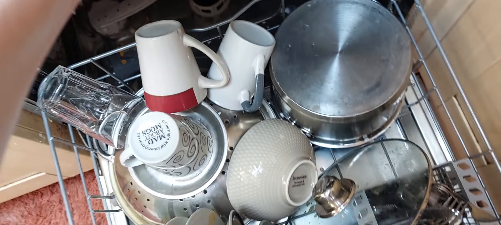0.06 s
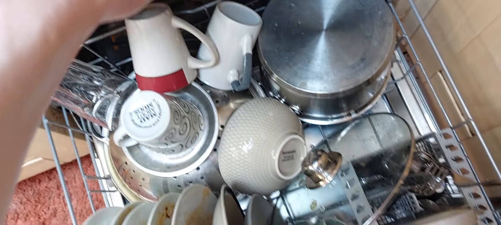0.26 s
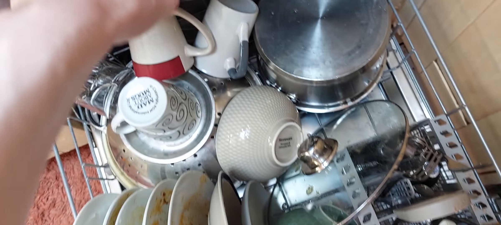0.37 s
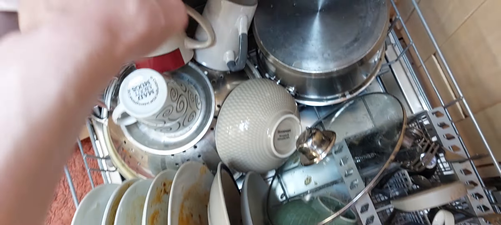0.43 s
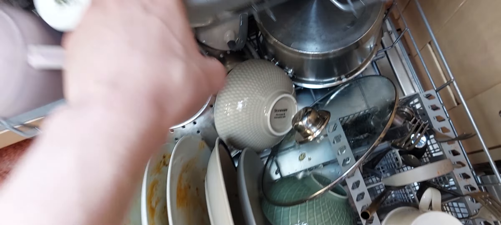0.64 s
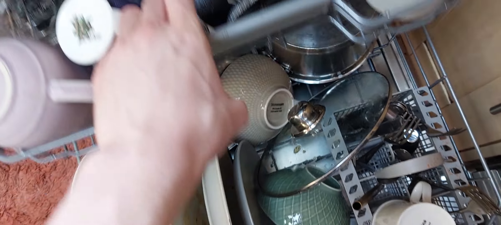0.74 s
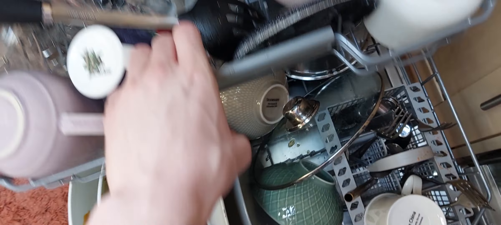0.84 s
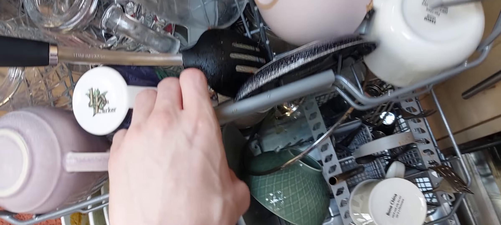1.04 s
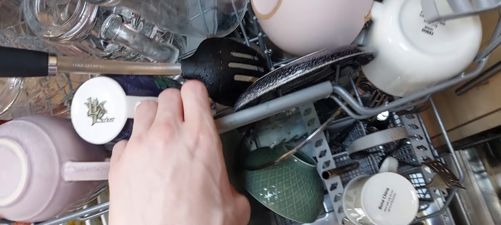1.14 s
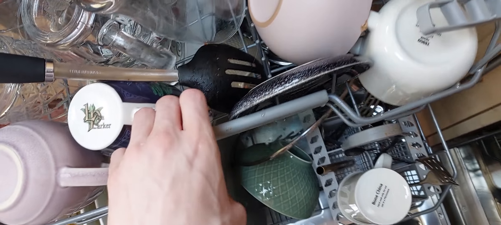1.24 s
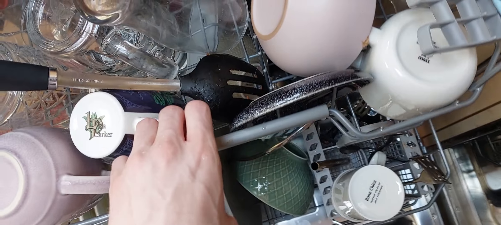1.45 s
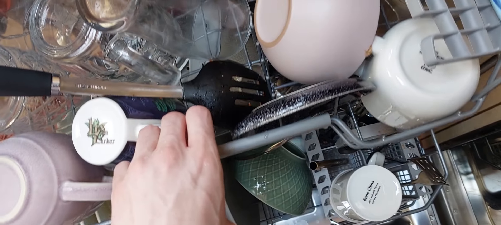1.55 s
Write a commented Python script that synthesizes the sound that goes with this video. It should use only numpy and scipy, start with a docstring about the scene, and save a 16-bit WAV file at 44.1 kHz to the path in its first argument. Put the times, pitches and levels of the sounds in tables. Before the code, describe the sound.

A loaded dishwasher rack rolls along its runners, crockery rattling, and stops with a sharp clack

```python
"""First a quiet room tone with faint rolling, then a loaded dishwasher rack pushed along its runners, close up.
Room tone is filtered noise. Wheel bumps and blows are clicks and pushes that ring modes of the steel tub.
Jolts shake wires and crockery: bursts of random collisions, each a broad crack plus ringing modes.
Cups chatter as repeated taps, hard contacts ring short modes, and the stop is a sharp clack.
Noise tails add the tub walls and the kitchen; the rolling fades out after the stop."""
import sys
import numpy as np
from scipy import signal
from scipy.fft import rfft, irfft
from scipy.io import wavfile

SR = 44100
rng = np.random.default_rng(int(sys.argv[2]) if len(sys.argv) > 2 else 0)


def volts_from_db(level):
    """Convert decibel levels to linear amplitude ratios."""
    exponent = np.asarray(level, float) / 20
    return 10 ** exponent


def materialize(psi):
    """Save the field psi as 16-bit PCM at rate SR to the path in sys.argv[1].

    A 1-D psi becomes a single channel; in a 2-D psi each row is a channel.
    """
    bounded = np.clip(np.atleast_2d(psi).T, -1, 1)
    quanta = np.round(bounded * 32767).astype(np.int16)
    wavfile.write(sys.argv[1], SR, quanta)


N = 70560
T = np.arange(N) / SR

# room tone spectrum, relative: f/Hz, density/dB
ROOM_TONE_SPECTRUM = [(30, -5), (80, -6.5), (130, -14), (205, -1.5), (245, -4.5), (282, -0.5), (345, -22.5),
                      (800, -24.5), (1250, -35), (1900, -20.5), (2600, -21.5), (3400, -40), (4500, -29.5),
                      (6500, -41), (16000, -48.5)]
# rolling wheels: t/s, boom level/dB, body level/dB, faint rattle level/dB
ROLL = [(0, -49.5, -53, -54.5), (0.159, -49, -56, -58.5), (0.199, -38, -45, -42.5), (.35, -37.5, -44, -50),
        (.5, -34, -41, -45.5), (.6, -36.5, -39, -43), (.82, -38, -44, -39.5), (.93, -40, -46.5, -44.5),
        (0.998, -45.5, -48, -54.5), (1.179, -55.5, -46.5, -65.5), (1.239, -65, -64, -59),
        (1.6, -59, -53.5, -67)]
# faint rattle spectrum, relative: f/Hz, density/dB
RATTLE_SPECTRUM = [(300, -11), (450, 7.5), (1000, -1), (2500, -10), (6000, -17), (9000, -26), (16000, -20)]
# blows into the tub: t/s, boom level/dB, body level/dB, knock level/dB, best struck knock mode f/Hz
THUDS = [(0.189, -53, -35.5, -30.5, 600), (0.220, -50, -52, -23, 559), (0.271, -37, -40, -30.5, 505),
         (0.317, -28.5, -47.5, -46, 500), (.445, -33, -33, -38, 496), (0.499, -48, -39.5, -50, 497),
         (0.628, -19, -20.5, -33, 700), (0.691, -25, -36, -18.5, 484), (0.728, -22.5, -47.5, -31.5, 496),
         (0.749, -25.5, -30.5, -17.5, 543), (0.845, -15.5, -27, -26.5, 670), (0.891, -29, -35, -39, 600)]
# tub modes, low, middle and high, as struck by blows: f/Hz, level/dB, t60/s
BOOM_MODES = [(62, -6, .13), (88, -8, .1), (115, 0, .16), (140, -7, .08)]
BODY_MODES = [(225, -9, .2), (272, -10, .15), (296, 0, .3), (335, -13, .08)]
KNOCK_MODES = [(512, 0, .08), (590, 0, .07), (690, 0, .07), (925, 8, .05)]
# wire and crockery modes: f/Hz, level/dB, t60/s
RACK_MODES = [(1535, -9, .02), (2132, -5, .025), (2290, -3, .025), (3250, -6, .02), (4000, -5, .015),
              (4880, 0, .015), (5540, 0, .015), (6680, -4, .012)]
# cup chattering against its neighbour: t/s, f/Hz, rms level/dB, duration/s
CLINKS = [(0.264, 709, -45, 0.036), (0.583, 3070, -47.5, 0.0115), (0.681, 3070, -44, .025),
          (0.982, 2590, -59.5, 0.072), (.995, 5390, -62, 0.075), (1.181, 5590, -64.5, 0.036)]
# single hard contacts of cups and wires: t/s, f/Hz, level/dB
TICKS = [(0.438, 4070, -32.5), (0.4584, 5240, -29.5), (0.495, 5450, -36), (.589, 5460, -34.5),
         (0.613, 5810, -23.5), (.6285, 5030, -27), (0.839, 4990, -9), (.847, 3340, -21.5),
         (0.854, 3160, -24.5)]
# jolts: t/s, hold/s, then level/dB of scrape, clatter, crisp, sizzle
JOLTS = [(0.027, 0.0058, -46.5, -59.5, -89, -74), (0.174, 0.027, -40, -91, -62.5, -68),
         (0.212, 0.0015, -37, -79, -79, -75), (0.253, 0.02, -45.5, -78, -66, -76),
         (0.4323, 0.011, -46, -45, -86, -79), (0.442, 0.015, -41, -43, -56, -48.5),
         (0.462, 0.022, -40, -45, -65, -66), (0.493, 0.0056, -38.5, -37.5, -58, -60),
         (0.5774, 0.013, -53, -44.5, -65, -57), (0.6224, 0.021, -34.5, -35.5, -52, -42),
         (0.691, 0.094, -42.5, -42.5, -56, -67.5), (0.717, 0.017, -34.5, -44, -48, -53),
         (0.7343, 0.018, -26.5, -25, -30.5, -41), (0.839, 0.0022, -24, -21.5, -21, -19.5)]
# bands of those four levels: low f/Hz, high f/Hz
JOLT_BANDS = [(380, 2900), (2900, 7200), (7200, 10600), (10600, 17000)]

ROOM_TONE_DB, ROOM_T60_S, ROOM_DB = -48.5, 0.29, -6.5
TUB_T60_S, TUB_DB = 0.031, -5  # wall reflections re direct sound
TUB_TO_ROOM_DB = -4  # the tub excites the room less than the clatter does
ALIKE_BELOW_HZ = 600  # above this the two microphones hear the room differently
# left over right
BASS_PAN_DB, TREBLE_PAN_DB, TONE_PAN_DB = -2, -5, -5
RIGHT_LEADS_S, LEAD_SPREAD_S = 0.0002135, 0.000165  # mean, scatter from spot to spot
WHEEL_BUMPS_PER_S = 250.3  # for boom and for body
RATTLE_PER_S, COLLIDE_PER_S = 2570, 1986  # collisions at each spot
BOOM_PUSH_S, BODY_PUSH_S, KNOCK_PUSH_S = 0.0026, 0.0015, 0.00035
KNOCK_FALL_DB_PER_OCT = -50  # away from the mode struck best
RACK_DB = -9  # modes re broad crack
CLINK_T60_S, CHATTER_PER_S, TICK_T60_S = 0.045, 400, 0.011
ATTACK_S, SETTLE_S = 0.00048, 0.0068  # rise, quick fall
LINGER_S, LINGER_DB = 0.016, -15  # weaker jitter


def unit(x):
    """Scale to unit rms."""
    return x / np.sqrt(np.mean(x ** 2))


def conv(x, h):
    """Convolve, cut to the scene length."""
    return signal.fftconvolve(x, h, axes=-1)[..., :N]


def add(out, x, start_s):
    """Mix x into out, cut at the end of the scene."""
    i = int(start_s * SR)
    out[..., i:i + x.shape[-1]] += x[..., :N - i]


def colour(x, spectrum):
    """Causal minimum-phase filter with the given spectrum, by folding the cepstrum."""
    f_hz, db = np.array(spectrum).T
    log_f = np.log(np.arange(2049) * SR / 4096 + 1)
    log_gain = np.interp(log_f, np.log(f_hz), db) * np.log(10) / 20
    cepstrum = irfft(log_gain)
    cepstrum[1:2048] *= 2
    cepstrum[2049:] = 0
    h = irfft(np.exp(rfft(cepstrum)))
    return conv(x, np.atleast_2d(h) if x.ndim > 1 else h)


def band(x, lo_hz, hi_hz):
    """Butterworth band-pass."""
    return signal.sosfilt(signal.butter(3, [lo_hz, hi_hz], "band", fs=SR, output="sos"), x)


def ring(modes, scatter_db=0., push_s=0., detune=0.):
    """Decaying modes after one soft push; fresh signs, strengths and detuning."""
    f_hz, db, t60_s = np.array(modes).T[:, :, None]
    t = T[:SR // 3]
    r = rng.standard_normal((len(modes), 3))
    wave = np.sin(2 * np.pi * f_hz * (1 + detune * r[:, 2:]) * t)
    strength = np.sign(r[:, :1]) * volts_from_db(db + scatter_db * r[:, 1:2])
    h = (strength * np.exp(-np.log(1000) * t / t60_s) * wave).sum(0)
    push = np.hanning(int(push_s * SR) + 3)
    return np.convolve(h, push / push.sum())[:len(t)]


def grains(rate_per_s, spread_db, size=N):
    """Random clicks of very uneven size, unit rms."""
    r = rng.random((3, size))
    r[0, 0] = 0  # the first contact is certain
    hit = r[0] < rate_per_s / SR
    size_db = np.minimum(-spread_db * np.log(r[2] + 1e-9), 4 * spread_db)
    return unit(hit * np.sign(r[1] - 0.5) * volts_from_db(size_db))


def pan(x, left_over_right_db):
    """Split a level difference between the channels."""
    return x * volts_from_db(np.array([[left_over_right_db / 2], [-left_over_right_db / 2]]))


def tail(t60_s):
    """Diffuse echo: two unrelated decaying noises, unit energy each."""
    h = rng.standard_normal((2, SR // 2)) * np.exp(-np.log(1000) * T[:SR // 2] / t60_s)
    return h / np.sqrt((h ** 2).sum(1, keepdims=True))


def spread(mid, side):
    """Bass alike on both microphones, treble differing."""
    side = signal.lfilter(*signal.butter(1, ALIKE_BELOW_HZ, "high", fs=SR), side)
    return mid + side * np.array([[1], [-1]])


def room_tone():
    """Steady hum and hiss of the kitchen: coloured noise."""
    mid, side = colour(rng.standard_normal((2, N)), ROOM_TONE_SPECTRUM)
    return pan(volts_from_db(ROOM_TONE_DB) * spread(mid, side) / mid.std(), TONE_PAN_DB)


def room_echo(clatter, tub):
    """Diffuse kitchen echo of clatter and tub."""
    source = clatter.mean(0) + volts_from_db(TUB_TO_ROOM_DB) * tub
    mid, side = conv(source[None], tail(ROOM_T60_S))
    return volts_from_db(ROOM_DB) * spread(mid, side)


def in_tub(x):
    """Direct sound, right channel leading, plus wall reflections drawn afresh for each spot."""
    lead_s = np.clip(RIGHT_LEADS_S + LEAD_SPREAD_S * rng.standard_normal(), 0, 0.0006)
    n = np.arange(len(x))
    left = np.interp(n - lead_s * SR, n, x)
    walls = conv(x[None], tail(TUB_T60_S))[:, :len(x)]
    return np.array([left, x]) + volts_from_db(TUB_DB) * walls


def collide(hits):
    """Tiny collisions crack broadly and ring the wires and cups."""
    ringing = conv(hits, ring(RACK_MODES, 3., detune=0.03))[:len(hits)]
    return unit(hits) + volts_from_db(RACK_DB) * unit(ringing)


def shaken(rate_per_s, env):
    """Collisions at three spots of the rack at once."""
    spots = []
    for _ in range(3):
        hits = env * grains(rate_per_s, 2.22, size=len(env))
        spots.append(in_tub(collide(hits)))
    return unit(sum(spots))


def wheel_bumps():
    """Rolling wheels bump the tub at random, ringing boom and body modes."""
    out = np.zeros(N)
    s, boom_db, body_db, _ = np.array(ROLL).T
    for modes, level_db, push_s in ((BOOM_MODES, boom_db, BOOM_PUSH_S), (BODY_MODES, body_db, BODY_PUSH_S)):
        # rolling: mode levels evened out, ringing shortened
        h = ring([(f, 0.5 * d, 0.3 * t60) for f, d, t60 in modes], 0., push_s)
        bumps = grains(WHEEL_BUMPS_PER_S, 1.8) * volts_from_db(np.interp(T, s, level_db))
        out += conv(bumps, h / np.sqrt((h ** 2).sum()))
    return out


def rolling_rattle():
    """Faint rattle while rolling: steady collisions, coloured."""
    s, *_, db = np.array(ROLL).T
    rattle = colour(shaken(RATTLE_PER_S, np.ones(N)), RATTLE_SPECTRUM)
    return volts_from_db(np.interp(T, s, db)) * unit(rattle)


def thuds():
    """Blows ring the tub; shorter pushes drive the higher mode groups."""
    out = np.zeros(N)
    for s, boom_db, body_db, knock_db, best_hz in THUDS:
        knock = [(f, d + KNOCK_FALL_DB_PER_OCT * abs(np.log2(f / best_hz)), t60) for f, d, t60 in KNOCK_MODES]
        for modes, db, push_s in ((BOOM_MODES, boom_db, BOOM_PUSH_S), (BODY_MODES, body_db, BODY_PUSH_S),
                                  (knock, knock_db, KNOCK_PUSH_S)):
            add(out, volts_from_db(db) * ring(modes, 1.5, push_s), s)
    return out


def clinks():
    """A cup chatters on its neighbour: random taps ring two close modes."""
    out = np.zeros((2, N))
    for s, hz, db, lasts_s in CLINKS:
        taps = grains(CHATTER_PER_S, 1., size=SR // 8) * (T[:SR // 8] < lasts_s)
        cup = ring([(hz, 0, CLINK_T60_S), (hz * 1.03, -4, CLINK_T60_S)])
        x = in_tub(conv(cup, taps))
        rms = np.sqrt((x.mean(0) ** 2).sum() / (lasts_s * SR))
        add(out, volts_from_db(db) * x / rms, s)
    return out


def ticks():
    """Single hard contacts: three short modes each."""
    out = np.zeros((2, N))
    for s, hz, db in TICKS:
        modes = [(hz, db, TICK_T60_S), (hz * 1.12, db - 5, TICK_T60_S), (hz * 0.87, db - 11.5, TICK_T60_S)]
        add(out, in_tub(ring(modes)), s)
    return out


def jolts():
    """Each jolt shakes the rack: a collision burst levelled band by band."""
    out, t = np.zeros((2, N)), T[:SR // 4]
    for s, hold_s, *band_dbs in JOLTS:
        fall = np.exp(-np.maximum(t - hold_s, 0) / SETTLE_S)
        linger = volts_from_db(LINGER_DB) * np.exp(-t / LINGER_S)
        env = np.minimum(t / ATTACK_S, 1) * (fall + linger)
        burst = shaken(COLLIDE_PER_S, env)
        x = sum(volts_from_db(db) * unit(band(burst, *hz)) for db, hz in zip(band_dbs, JOLT_BANDS))
        add(out, x * np.sqrt(np.mean(env ** 2)), s)
    return out


def scene():
    """Rack clatter, tub, kitchen echo and room tone in stereo."""
    tub = wheel_bumps() + thuds()
    clatter = rolling_rattle() + clinks() + ticks() + jolts()
    low = tub + room_echo(clatter, tub)
    return room_tone() + pan(low, BASS_PAN_DB) + pan(clatter, TREBLE_PAN_DB)


def band_limit(x):
    """A steep low-pass at the top of the band."""
    return signal.sosfilt(signal.butter(12, 17090, fs=SR, output="sos"), x)


def record(dry):
    """The microphone cuts deep bass; a steep low-pass at 15.9 kHz limits the top."""
    x = signal.sosfilt(signal.butter(5, 46, "high", fs=SR, output="sos"), dry)
    x = signal.sosfilt(signal.ellip(8, 0.3, 30, 15900, fs=SR, output="sos"), x)
    return band_limit(x)


dry = scene()
out = record(dry)
materialize(out)
```